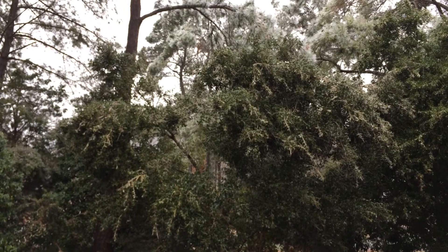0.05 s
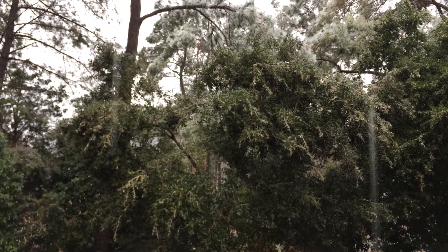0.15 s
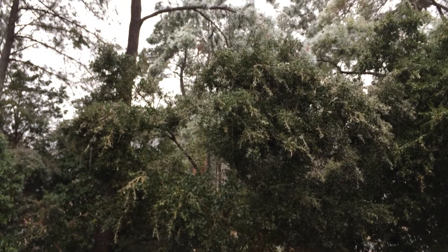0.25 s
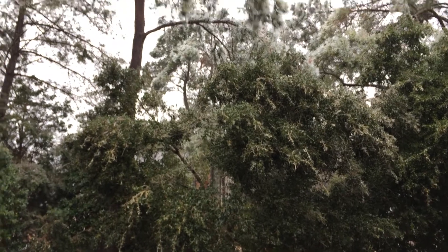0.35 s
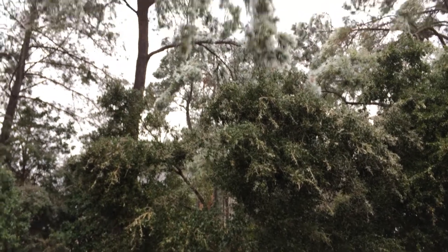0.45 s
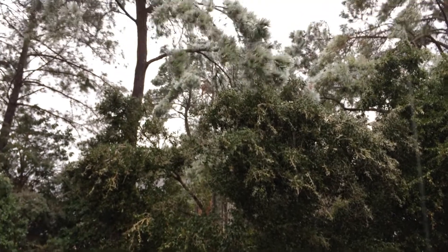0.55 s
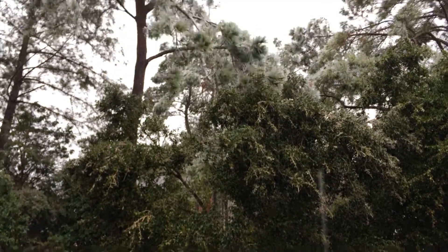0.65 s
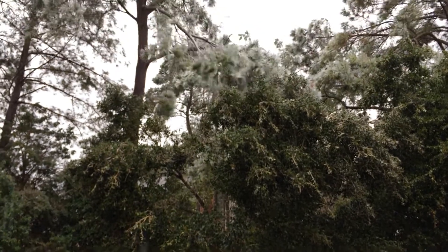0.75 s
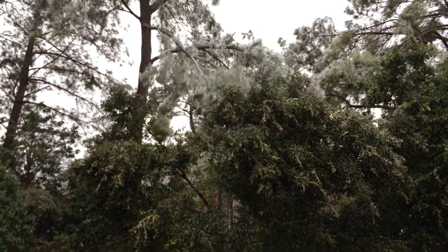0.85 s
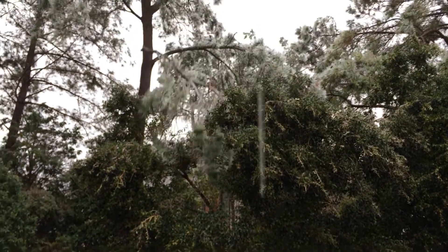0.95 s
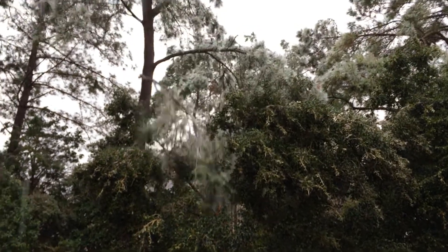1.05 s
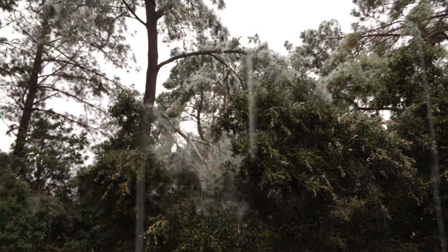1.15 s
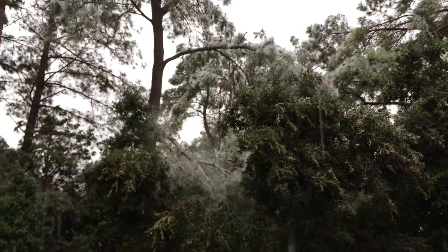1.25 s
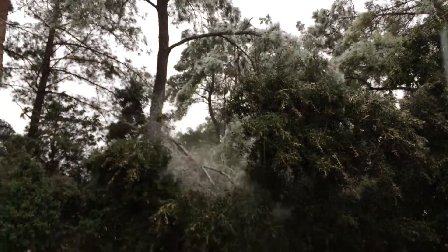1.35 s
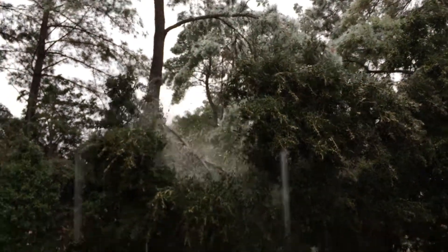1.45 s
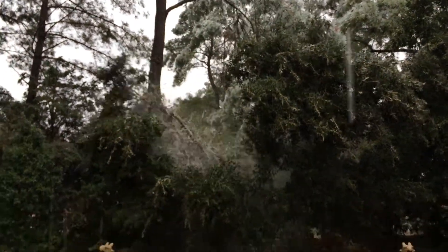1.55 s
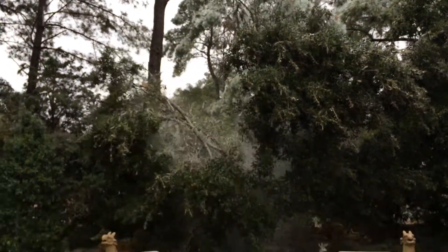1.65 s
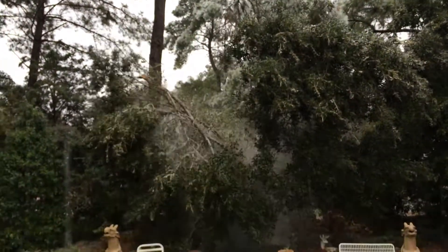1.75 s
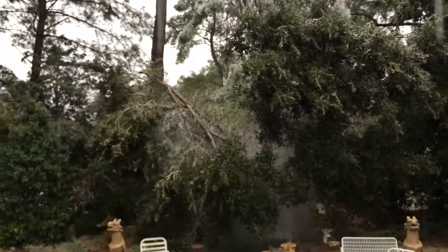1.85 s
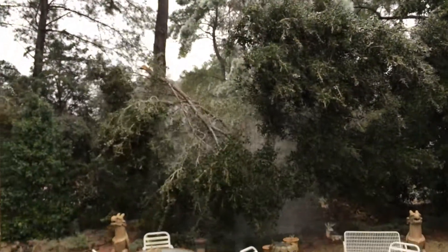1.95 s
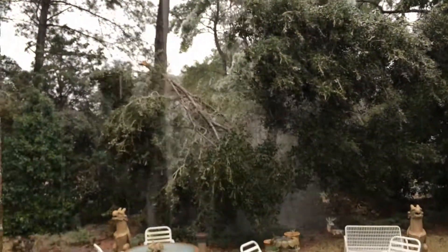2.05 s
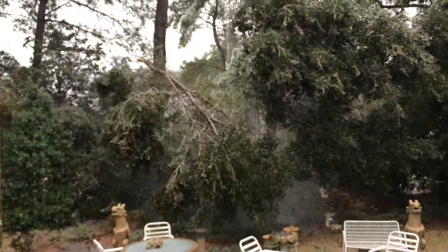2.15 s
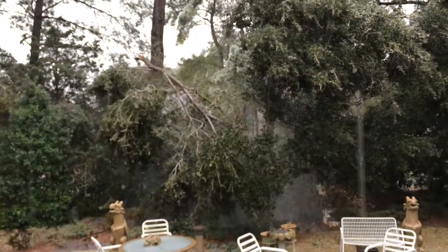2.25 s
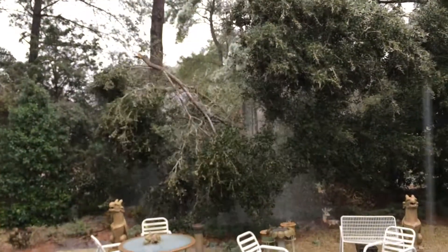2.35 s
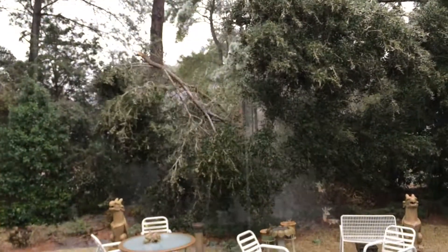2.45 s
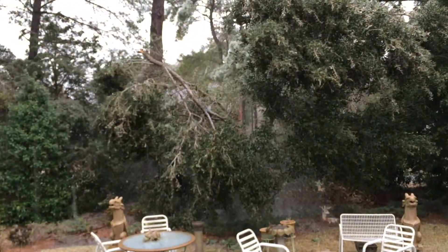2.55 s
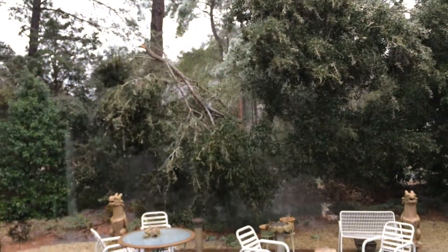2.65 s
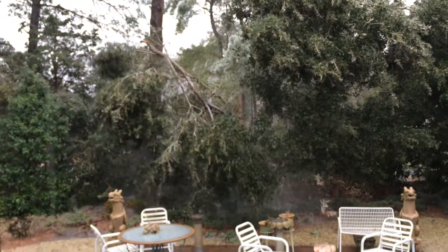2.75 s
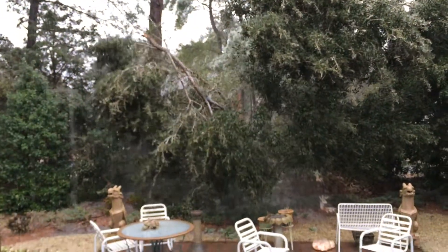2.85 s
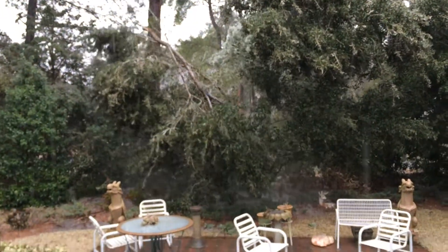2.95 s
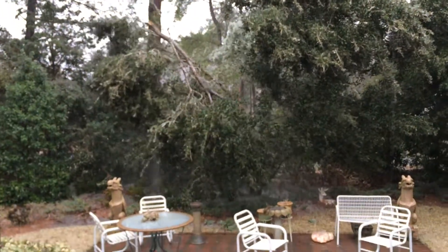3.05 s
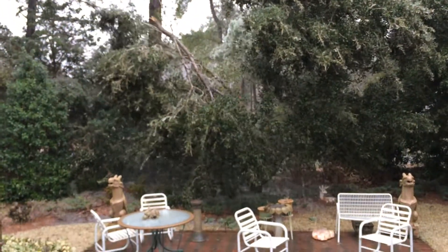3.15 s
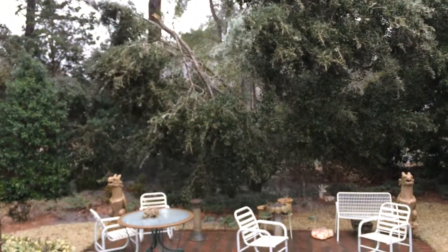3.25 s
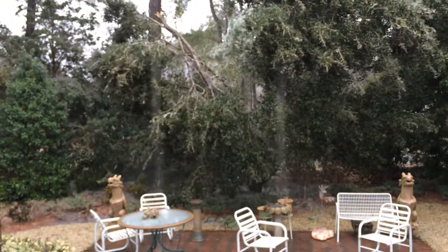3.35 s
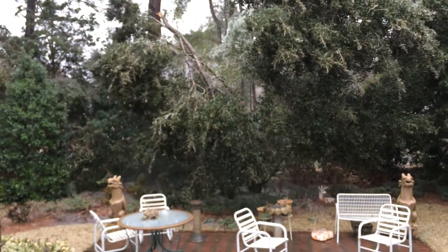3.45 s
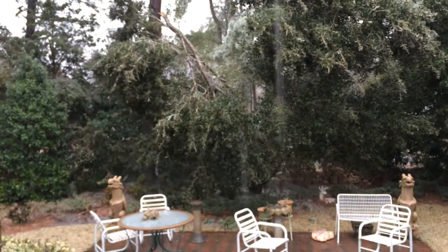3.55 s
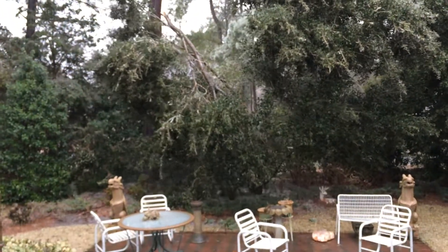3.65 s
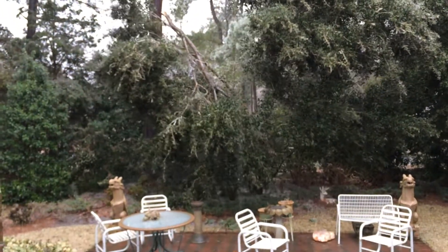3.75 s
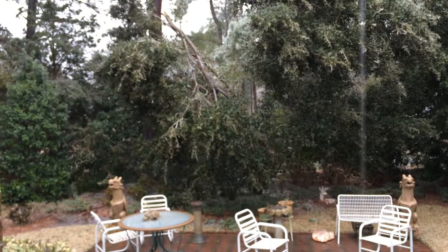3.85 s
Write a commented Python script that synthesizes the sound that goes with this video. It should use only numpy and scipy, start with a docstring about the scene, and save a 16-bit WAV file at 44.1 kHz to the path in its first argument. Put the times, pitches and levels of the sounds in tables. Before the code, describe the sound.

Tree limb snapping with echoing wood cracks, then falling as shattered ice rattles down over rain.

```python
"""A yard with trees, in freezing rain: across it an ice-laden limb breaks high in a tree.
Sharp wood cracks, bursts of noise with a short ring, scatter back as echoes; knocks on branches follow.
Twigs crackle and ice showers down, both dense grains of clicks; the shower swells, then slowly thins.
Short bright bursts tick close by, over a grainy patter of rain and a distant engine's hum of sine orders."""
import sys
import numpy as np
from scipy import signal
from scipy.fft import rfft, irfft
from scipy.io import wavfile
from scipy.ndimage import uniform_filter1d

SR = 44100
rng = np.random.default_rng(int(sys.argv[2]) if len(sys.argv) > 2 else 0)


def put_to_file(sound):
    """Save the sound as 16-bit audio at rate SR, in the file named by the first command-line argument."""
    columns = np.atleast_2d(sound).T  # one column per channel
    safe = np.clip(columns, -1, 1)
    whole_steps = np.round(safe * 32767)
    wavfile.write(sys.argv[1], SR, whole_steps.astype(np.int16))


N = 171990

# Wood cracking, band and ring levels before the shared trim and colour; echo is relative to the direct snap;
# the last row, at 0.804 s, is a small crackle of ice: t/s, level/dB at each of the four band frequencies, snap
# decay/s, echo level/dB, ring f/Hz, ring level/dB
WOOD_CRACKS = [(0.001, -23, -16.5, -21, -25.5, 0.0013, 9, 1400, -30),
               (0.064, -21, -14, -24, -39, .001, -1, 1700, -21),
               (0.083, -14, -19, -29, -47, 0.0034, -1, 1160, -32),
               (0.187, -18, -18, -29, -33, 0.0084, 11.5, 1200, -32),
               (0.218, -15, -5.5, -2, -7, 0.0017, -3, 2720, 1),
               (0.2443, -4.5, -3.5, -9, -12.5, 0.0019, 8, 1040, -20),
               (0.330, -18, -6, -10.5, -21, 0.0038, 6.5, 1610, -11),
               (0.376, -13, 3.5, -4, -9.5, 0.0043, -1, 945, 1.5),
               (0.384, -9.5, 5, -6, -12, 0.024, 4, 970, -2), (0.437, -9, -3, -3, -6.5, 0.0024, 2, 2870, -9),
               (0.4526, -1, -7, 8.5, -9.5, 0.0018, 3.5, 2930, -6),
               (0.4599, -1, 3, -9, -16, .012, 6.5, 3800, -9),
               (0.577, -23, -22, -22, -26, 0.0055, -4, 570, -2),
               (0.585, -16, -11, -16, -32, 0.026, 9.5, 970, -28),
               (0.617, -1.5, -4.5, -19, -19, 0.007, -3, 1430, -11),
               (0.624, -11, -20, -28, -31, 0.0056, 5, 1800, -10),
               (0.705, -25, -10, -15, -9, 0.0021, 7, 1450, -8.5),
               (0.7175, -11, -18, -6, -23, 0.00092, 6.5, 1930, -23),
               (0.675, -19, -15, -22, -27, 0.012, 10, 504, -14),
               (0.738, -2, -14, -6.5, -25, 0.013, -7, 290, -12),
               (0.804, -30, -19, -18, -10, 0.0044, 0, 3050, -10)]
# The limb striking branches: the same columns, with a crunch for the snap
BRANCH_KNOCKS = [(1.197, -1, -4.5, 6.5, -4, 0.019, -9, 2120, 1),
                 (1.222, -13, -14, -4, -10, 0.0078, -8, 3740, -11),
                 (1.278, 0, 2.5, -1, -2.5, 0.0099, 0, 370, 0.5),
                 (1.542, -5, -0.5, -3, -6, .007, -3, 756, -18),
                 (1.558, -3, -7.5, -4, -13, 0.011, -3, 1550, -17),
                 (1.654, -3, -3.5, -5, -9, 0.0096, -4, 3500, -0.5),
                 (2.693, -16, -17, -14, -24, 0.0038, -1, 1190, -23),
                 (3.296, -43, -35.5, -14, -18, 0.0021, -3, 4370, -8),
                 (3.310, -23, -31, -15, -23, 0.0016, -5, 1300, -23)]
# Centres of the four level columns above: f/Hz
BLOW_BAND_HZ = (400, 1100, 3000, 7000)
# Tone shared by all cracks and knocks: f/Hz, level/dB
WOOD_COLOUR = [(25, -29), (70, -6), (150, -8), (220, -14), (380, 0), (650, 3), (950, 6), (1400, 7),
               (2300, 4), (2900, 3), (4300, 1.5), (5300, 4), (7200, 1.5), (8200, -2.5), (15000, -12)]
# Tone of the echo among the trees: f/Hz, level/dB
TREE_ECHO_COLOUR = [(200, 4), (1000, -5.5), (6000, 2.5), (14000, -1.5)]
# Flow of shattered ice, before its trim: t/s, level/dB
ICE_FLOW_CURVE = [(0, -56), (.17, -48.5), (.55, -41.5), (.67, -38.5), (.73, -36), (.82, -29), (.92, -25.5),
                  (1.05, -20.5), (1.16, -22), (1.3, -21), (1.48, -20), (1.6, -24), (1.73, -26.5),
                  (2.3, -26.5), (2.6, -29.5), (3.1, -31), (3.29, -32), (3.42, -33.5), (3.62, -35),
                  (3.9, -37.5)]
# Tone of the ice chips: f/Hz, level/dB
ICE_CHIP_COLOUR = [(150, -23), (400, -17), (700, -9), (1100, -6), (2400, -3.5), (2900, -1), (4400, -0.5),
                   (5400, 1), (7200, .5), (8000, -1), (11000, -2.5), (14000, -4.5), (15200, -4.5)]
# Twigs and needles thrashed by the limb: t/s, level/dB
THRASH_CURVE = [(0, -50), (.55, -41.5), (.68, -38.5), (.82, -41), (.92, -44), (.97, -29.5), (1.13, -35.5),
                (1.25, -32), (1.5, -33), (1.62, -35.5), (1.8, -40), (2.2, -41.5), (2.8, -43), (3.9, -55)]
# Tone of the thrashing: f/Hz, level/dB
TWIG_COLOUR = [(120, -24), (250, -7), (400, -3.5), (600, -14.5), (1100, -0.5), (1900, -2), (2400, -9.5),
               (3000, 2), (6000, -13), (14000, -55)]
# Ice landing close by, before its trim: t/s, level/dB, decay/s
NEAR_TICKS = [(0.006, -24, .0006), (0.141, -35, .0008), (0.146, -16.5, 0.019), (2.362, -12, .0002),
              (3.604, -11, .0002), (3.712, -26, .0004), (3.815, -17, .002)]
# Tone of the close ticks: f/Hz, level/dB
NEAR_TICK_COLOUR = [(300, -26), (2000, -29), (4500, 5), (15000, 9.5)]
# Tone of the rain and low outdoor rumble: f/Hz, level/dB
RAIN_RUMBLE_COLOUR = [(25, -19), (36, -11), (52, 11.5), (100, 12.5), (160, 4.5), (240, 0), (500, -2.5),
                      (850, 0.5), (1300, -4), (3000, -3.5), (7000, -5), (15000, -14.5)]
# Partials of the distant engine: multiple of the shaft rate, level/dB before the hum curve
ENGINE_PARTIALS = [(2, -46.5), (3, -46.5), (4, -55.5), (5, -57.5), (6, -63)]
# Rise and fall of the engine hum: t/s, level/dB
HUM_CURVE = [(0, -7), (.25, 2.5), (.48, 3), (.62, -4), (1.5, -11), (2.1, -1.5), (3.0, -2), (3.9, 1.5)]

CRACK_DB, KNOCK_DB = -19.5, -18.5  # trims
RING_T60_S, RING_ECHO_DB = 0.019, -6  # how much less of the ring than of the snap feeds the echo
ECHO_DELAY_S, ECHO_SPREAD_DB = .004, 3
NEAR_T60_S, FAR_T60_S, FAR_DB = .2, .5, -16  # quick fall; long tail and its starting level
ICE_PEAK_PER_S, ICE_SPREAD_DB, ICE_DB = 22000, 2, 2  # chip density where the flow is strongest
TWIGS_PER_S, TWIG_SPREAD_DB = 1500, 3.5
TICK_DB, RAIN_DB = -30.5, -43.5
SHAFT_HZ = 29.17
PEAK_LIMIT, TOP_HZ = .8, 15300


def limb():
    """The limb splinters off the trunk, then strikes branches on its way down."""
    return wood(WOOD_CRACKS, CRACK_DB) + wood(BRANCH_KNOCKS, KNOCK_DB)


def wood(rows, level_db):
    """Each blow is a rush of snapping fibres and a short ring, echoed among the trees."""
    direct, sent = np.zeros(N), np.zeros(N)
    for start, *band_db, decay_s, echo_db, ring_hz, ring_db in rows:
        snap = colour(burst(decay_s), list(zip(BLOW_BAND_HZ, band_db)))
        note = undb(ring_db) * ring(ring_hz)
        echo_feed = snap + undb(RING_ECHO_DB) * note
        add(direct, start, snap + note)
        add(sent, start, echo_feed * undb(echo_db))
    return undb(level_db) * colour(direct + trees(sent), WOOD_COLOUR)


def burst(decay_s, size=4096):
    """A fracture: a dying noise rush, near-even in spectrum, with the energy of 20 ms at rms 1."""
    fade = np.exp(-np.arange(size) / SR / decay_s)
    x = rng.standard_normal(size) * fade
    for _ in range(3):  # flatten the spectrum, then restore the dying shape
        spectrum = rfft(x)
        flat = irfft(spectrum / (np.abs(spectrum) + 1e-12))
        x = flat * np.sqrt(fade)
    return x * np.sqrt(SR / 50 / np.sum(x ** 2))


def ring(hz, size=4096):
    """The damped note of a piece of wet wood, with the energy of 1 ms at rms 1."""
    t = np.arange(size) / SR
    x = np.sin(2 * np.pi * hz * t) * np.exp(-np.log(1000) * t / RING_T60_S)
    return x * np.sqrt(SR / 1000 / np.sum(x ** 2))


def trees(x):
    """Echo of the yard: many scattered reflections, a quick fall and a faint long tail."""
    t = np.arange(N) / SR - ECHO_DELAY_S
    near_fall = undb(-60 * t / NEAR_T60_S)
    far_fall = undb(FAR_DB) * undb(-60 * t / FAR_T60_S)
    response = grains(7000, ECHO_SPREAD_DB) * (near_fall + far_fall) * (t > 0)
    response /= np.sqrt(np.sum(response ** 2))
    return colour(signal.fftconvolve(x, response)[:N], TREE_ECHO_COLOUR)


def ice_shower():
    """Countless ice chips hit leaves and ground; a stronger flow has more of them."""
    flow = curve(ICE_FLOW_CURVE)
    chips = grains(ICE_PEAK_PER_S * np.sqrt(flow / flow.max()), ICE_SPREAD_DB)
    flutter = undb(ICE_DB + 0.56 * walk(24.47))
    return unit(colour(chips, ICE_CHIP_COLOUR)) * flow * flutter


def twigs(flurry_db=2.2):
    """Twigs crackle in uneven flurries as the limb sweeps through them."""
    crackle = unit(colour(grains(TWIGS_PER_S, TWIG_SPREAD_DB), TWIG_COLOUR))
    return crackle * curve(THRASH_CURVE) * undb(flurry_db * walk(60))


def near_ticks():
    """Single bits of ice land close to the listener: fracture bursts, bright and without echo."""
    out = np.zeros(N)
    for start, db, decay_s in NEAR_TICKS:
        add(out, start, undb(db) * burst(decay_s))
    return undb(TICK_DB) * colour(out, NEAR_TICK_COLOUR)


def rain():
    """Fine patter of freezing rain and a low outdoor rumble, both filtered from one stream of clicks."""
    return undb(RAIN_DB) * unit(colour(grains(9000, 3.36), RAIN_RUMBLE_COLOUR))


def engine(waver_db=1.5, own_db=1.1, drift=0.0022):
    """A far engine: orders of one drifting shaft throb together once a turn, and the hum wavers."""
    shaft_hz = SHAFT_HZ * (1 + drift * walk(4.87))
    turns = np.cumsum(shaft_hz) / SR + rng.random()
    hum = np.zeros(N)
    for order, db in ENGINE_PARTIALS:
        hum += undb(db + own_db * walk(9)) * np.sin(2 * np.pi * round(order) * turns)
    return np.sqrt(2) * hum * curve(HUM_CURVE) * undb(waver_db * walk(18))


def grains(per_s, spread_db):
    """Random clicks, mostly small and a few large; rms near 1 at any density."""
    chance = np.clip(per_s / SR, 0, 1)
    size = undb(spread_db * np.minimum(rng.exponential(size=N), 5))
    struck = rng.random(N) < chance
    return struck * rng.choice([-1, 1], N) * unit(size) / np.sqrt(chance)


def walk(rate):
    """Smooth random drift around zero with rms 1 or near it, from steps drawn at a rate in Hz."""
    k = int(SR / rate)
    steps = np.repeat(rng.standard_normal(N // k + 1), k)
    return unit(uniform_filter1d(uniform_filter1d(steps, k), k)[:N])


def colour(x, points, size=2048):
    """Causal minimum-phase filter through (f/Hz, level/dB) points, joined on a log frequency axis."""
    hz, db = np.array(points, float).T
    grid_hz = np.arange(size + 1) * SR / 2 / size
    log_gain = np.log(undb(np.interp(np.log(grid_hz + 1), np.log(hz), db)))
    cepstrum = irfft(log_gain)
    cepstrum[1:size] *= 2  # fold onto positive time
    cepstrum[size + 1:] = 0
    response = irfft(np.exp(rfft(cepstrum)))[:size]
    return signal.fftconvolve(x, response)[:len(x)]


def curve(rows):
    """Gain over time from (t/s, level/dB) points."""
    return undb(np.interp(np.arange(N) / SR, *np.array(rows).T))


def add(out, start, x):
    """Mix a sound in at a time in seconds."""
    i = max(int(start * SR), 0)
    out[i:i + len(x)] += x[:N - i]


def unit(x):
    """Scale to rms 1."""
    return x / np.sqrt(np.mean(x ** 2))


def undb(db):
    """Decibels to gain."""
    return 10 ** (np.asarray(db) / 20)


def scene():
    """The whole yard, heard the same in both ears."""
    yard = limb() + ice_shower() + twigs() + near_ticks() + rain() + engine()
    return np.array([yard, yard])


def record(dry):
    """Soft saturation rounds the sharpest peaks, then a steep low-pass cuts the top."""
    rounded = dry / (1 + (dry / PEAK_LIMIT) ** 4) ** (1 / 4)
    low_pass = signal.ellip(10, .2, 70, TOP_HZ, fs=SR, output="sos")
    return signal.sosfilt(low_pass, rounded)


dry = scene()
out = record(dry)
put_to_file(out)
```